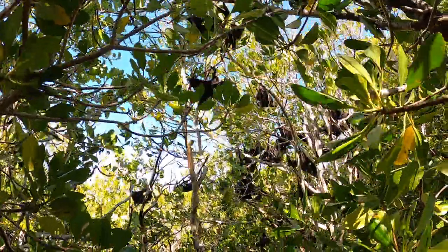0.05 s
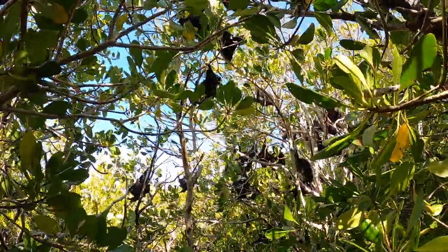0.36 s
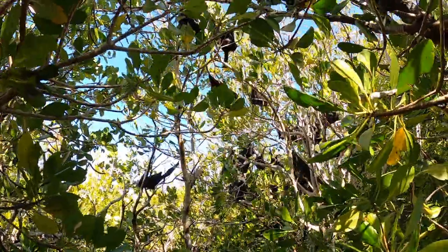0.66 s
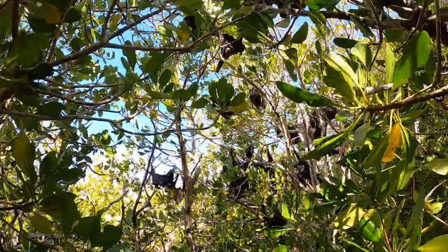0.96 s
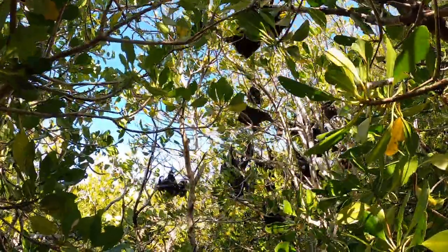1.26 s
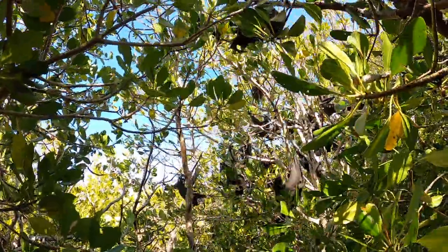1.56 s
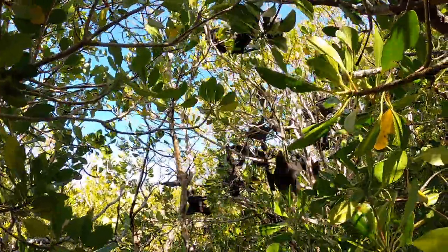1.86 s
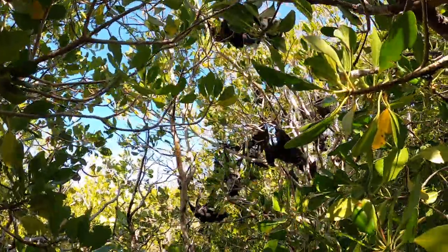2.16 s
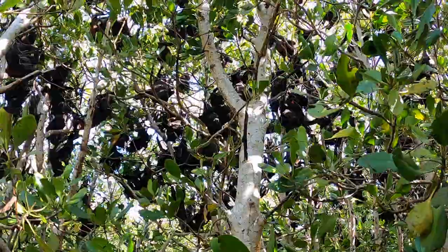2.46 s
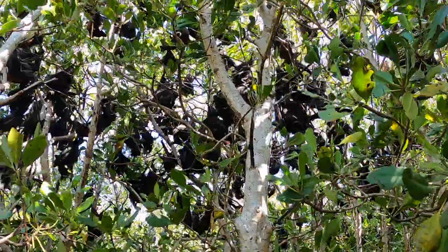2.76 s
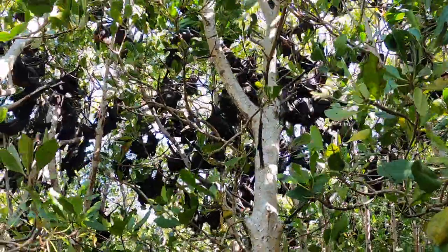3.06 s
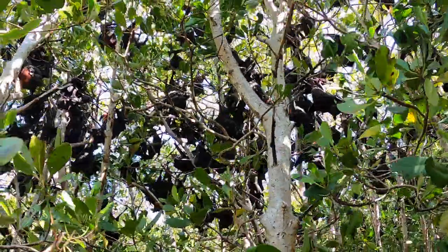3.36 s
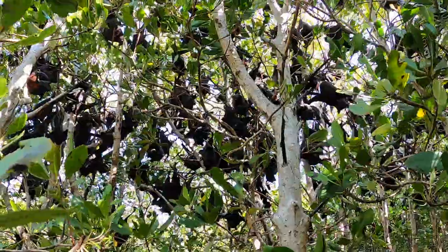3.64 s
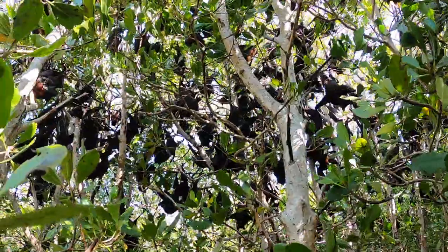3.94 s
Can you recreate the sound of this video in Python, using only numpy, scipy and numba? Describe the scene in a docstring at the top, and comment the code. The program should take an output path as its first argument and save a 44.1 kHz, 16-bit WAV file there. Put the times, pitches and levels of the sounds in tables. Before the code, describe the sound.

Fruit bats squeal raspily and give short yelps throughout the four seconds, over the dense chatter of a distant colony and a swelling hiss of high screeches. Leaves rustle faintly, and soft wing flaps come until about 2.3 seconds. Near 2.5 seconds the sound narrows as the listening spot changes, and the calls continue. Light wind puffs touch the microphone around 2.4 and 3 seconds.

```python
"""Rasping squeals and short yelps of fruit bats stand out of a dense far chatter in leafy trees. Larynx pulses
ring each bat's throat to make a squeal; a yelp is a shaky two-harmonic note. Trunks and foliage scatter the
calls. High screeches merge into a hiss, leaves rustle, wings flap and a little wind touches the microphone. At
2.49 s the stereo image narrows: from there on all but the top treble is mono."""
import sys
import numpy as np
from scipy import signal
from scipy.fft import rfft, irfft, next_fast_len
from scipy.io import wavfile
from scipy.ndimage import uniform_filter1d
from numba import njit

SR = 44100
rng = np.random.default_rng(int(sys.argv[2]) if len(sys.argv) > 2 else 0)


def generate_wav(sig):
    """Save sig (samples, or channels by samples) to the path in sys.argv[1] as 16-bit PCM at SR."""
    pcm = np.round(np.clip(np.atleast_2d(sig).T, -1, 1) * 32767).astype(np.int16)
    wavfile.write(sys.argv[1], SR, pcm)


N = 176400
CALL_N = SR // 2  # longest call, samples

# Mouth colour of near and far squeals. Each row: frequency in Hz, gain in dB.
MOUTH = [(200, -24), (900, -8), (1600, -6.5), (1850, -3.5), (2100, 1.5), (2450, -.5), (3000, 0.5),
         (7300, 0.5), (9000, -16), (13000, -16)]


def amp(db):
    """Decibels to gain."""
    return 10 ** (np.asarray(db) / 20)


def unit(x):
    """Scale to rms 1."""
    return x / np.sqrt(np.mean(x ** 2) + 1e-20)


def along(points, hz):
    """Interpolate (Hz, value) rows on a log axis."""
    knot_hz, values = np.transpose(points)
    return np.interp(np.log(hz + 1), np.log(knot_hz + 1), values)


def curve(rows):
    """One value per sample from (s, value) rows."""
    return np.interp(np.arange(N) / SR, *np.transpose(rows))


def wobble(rate_hz, n):
    """Random curve of n samples, rate_hz knots a second."""
    knots = rng.standard_normal(1024)
    return np.interp(np.arange(n) * rate_hz / SR, np.arange(len(knots)), knots)


def filtered(x, response):
    """Apply a gain given as a function of Hz."""
    size = next_fast_len(N + SR // 4)
    return irfft(rfft(x, size) * response(np.fft.rfftfreq(size, 1 / SR)), size)[..., :N]


def coloured(x, spectrum):
    """Shape x by (Hz, dB) rows, at rms 1."""
    return unit(filtered(x, lambda hz: amp(along(spectrum, hz))))


def add(track, start_s, sound):
    """Mix a sound in; it may overhang either end."""
    i = round(start_s * SR)
    part = sound[max(-i, 0):max(N - i, 0)]
    track[max(i, 0):][:len(part)] += part


@njit
def ring(drive, pole):
    """Moving resonance, applied twice for steep skirts."""
    out = np.zeros(len(drive))
    first = second = 0j
    for i in range(len(drive)):
        first = first * pole[i] + drive[i]
        second = second * pole[i] + first
        out[i] = second.real
    return out


def gesture(length_s, start_hz, end_hz, quaver):
    """Envelope and frequency of one call: a quavering glide, arched in the middle."""
    attack_s, release_s, arch, quaver_hz = 0.016, 0.022, 0.025, 113.7
    t = np.arange(min(int((length_s + release_s) * SR), CALL_N)) / SR
    progress = np.clip(t / length_s, 0, 1)
    env = np.clip(t / attack_s, 0, 1) * np.clip((length_s - t) / release_s / 2 + .5, 0, 1)
    bend = arch * (np.sin(np.pi * progress) - 2 / np.pi) + quaver * wobble(quaver_hz, len(t))
    return env, (start_hz + (end_hz - start_hz) * progress) * (1 + bend)


def flutter(voice, depth_db=1.5, rate_hz=110.4):
    """The level of a call trembles; rms 1."""
    return unit(voice * amp(depth_db * wobble(rate_hz, len(voice))))


def squeal(length_s, start_hz, end_hz, width_hz, whistle):
    """Uneven larynx pulses ring a gliding throat; a whistle rides on its resonance."""
    rasp_hz, pulse_scatter_db, air_db, upper_db = 452.1, 1.5, -17, -21.5
    env, hz = gesture(length_s, start_hz, end_hz, quaver=0.0121)
    pulse_hz = rasp_hz * np.exp(.3 * rng.normal() + .12 * wobble(rasp_hz, len(env)))
    pulses = np.diff(np.floor(np.cumsum(pulse_hz) / SR), prepend=0)
    size, air = rng.standard_normal((2, CALL_N))[:, :len(env)]
    drive = pulses * amp(pulse_scatter_db * size) + amp(air_db) * air

    def throat(centre_hz, band_hz):
        return unit(ring(drive, np.exp(np.pi * (2j * centre_hz - band_hz) / SR)))

    rasp = np.sqrt(1 - whistle) * throat(hz, 1.58 * width_hz)
    tone = np.sqrt(whistle) * np.sin(2 * np.pi * np.cumsum(hz) / SR)
    upper = amp(upper_db) * throat(np.minimum(2.28 * hz, 7000), band_hz=1330)
    return env * flutter(rasp + tone + upper)


def yelp(length_s, start_hz, end_hz, second_db):
    """Short voiced note of two harmonics with a shaky pitch."""
    env, hz = gesture(length_s, start_hz, end_hz, quaver=.008)
    phase = 2 * np.pi * np.cumsum(hz) / SR
    return env * flutter(np.sin(phase) + amp(second_db) * np.sin(2 * phase))


def grove(x, wet_db):
    """Direct sound plus scatter from trunks and foliage, as mid and side."""
    # Decay of the scatter. Each row: frequency in Hz, T60 in seconds.
    decay = [(200, 0.13), (2500, 0.33), (10000, 0.19)]
    hz, t, noise = signal.stft(rng.standard_normal((2, SR // 2)), SR, nperseg=256)
    tail = signal.istft(noise * amp(-60 * t / along(decay, hz)[:, None]), SR, nperseg=256)[1]
    response = amp(wet_db) * tail / np.linalg.norm(tail[0])
    response[0, 0] += 1  # direct path
    return signal.fftconvolve(x[None], response, axes=1)[:, :N] / np.sqrt(1 + amp(2 * wet_db))


def near(voice, rows):
    """Bats close by, one call per row."""
    track = np.zeros(N)
    for start_s, length_s, level_db, *shape in rows:
        add(track, start_s, amp(level_db) * voice(length_s, *shape))
    return track


def near_squeals():
    """Close squeals, coloured by the mouth and scattered by the trees."""
    # Each row: start in seconds, length in seconds, relative level in dB,
    # throat start, end and nominal width in Hz, whistle share 0-1.
    squeals = [(0, 0.11, -27.5, 2650, 2800, 610, 0.5), (0.032, 0.13, -34, 2150, 2122, 250, 0.5),
               (0.188, 0.2, -28.5, 2450, 2175, 610, 0.3), (0.176, 0.082, -32.5, 1560, 1440, 200, .5),
               (0.262, 0.083, -31, 1780, 1790, 150, .6), (0.379, 0.12, -29.5, 2300, 2330, 500, 0.04),
               (0.586, 0.12, -29, 2350, 2384, 540, 0.4), (0.719, .16, -27, 2850, 2660, 1170, 0.27),
               (0.739, .13, -39.5, 6500, 6100, 2200, .05), (0.858, .08, -31.5, 2500, 2120, 500, 0),
               (.91, .12, -27.5, 2980, 2870, 304, 0.07), (1.013, 0.061, -30, 3920, 4030, 1000, .2),
               (1.021, 0.15, -28.5, 2600, 2610, 547, 0.24), (1.148, 0.075, -26.5, 2780, 2810, 540, 0),
               (1.22, 0.1, -30, 2650, 2520, 450, 0.2), (1.321, .15, -32.5, 3400, 3600, 1300, 0.2),
               (1.427, 0.19, -32.5, 3740, 4150, 1690, 0), (1.387, 0.23, -31, 2400, 2230, 495, .1),
               (1.584, 0.09, -25, 2380, 2450, 298, 0.7), (1.675, .11, -24.5, 2424, 2427, 220, 0.83),
               (1.796, 0.097, -30, 3750, 3470, 1300, 0.3), (1.816, 0.034, -39, 6350, 6500, 1500, .1),
               (1.875, 0.17, -28.5, 2550, 2550, 577, 0.14), (1.997, 0.15, -28, 2520, 2680, 446, 0.8),
               (2.179, 0.061, -27, 2600, 2550, 573, 0.05), (2.286, 0.12, -28, 2480, 2325, 500, 0.45),
               (2.405, 0.069, -24.5, 2230, 2450, 346, .45), (2.481, 0.052, -21.5, 3350, 3550, 750, 0.54),
               (2.481, 0.092, -30.5, 2350, 2150, 500, 0), (2.53, .2, -32, 3950, 3400, 1500, 0),
               (2.663, 0.052, -42, 7270, 7200, 400, .5), (2.68, .055, -37, 6750, 6600, 400, .5),
               (2.728, 0.12, -28.5, 2230, 2260, 795, 0), (2.76, 0.17, -35, 5040, 5300, 1600, .06),
               (2.848, 0.056, -24, 2380, 2360, 495, 0.24), (2.941, 0.024, -19, 2400, 2433, 346, 0.2),
               (3.084, 0.033, -22.5, 2350, 2347, 300, 0.7), (3.116, 0.043, -24.5, 2850, 2940, 700, 0.3),
               (3.163, 0.11, -28.5, 2450, 2520, 550, 0.3), (3.233, 0.11, -26, 2850, 2930, 696, 0.1),
               (3.346, .065, -25, 3000, 2920, 500, 0.4), (3.192, 0.19, -32.5, 4400, 4310, 1300, 0.1),
               (3.405, 0.15, -28.5, 2550, 2447, 590, 0.4), (3.558, 0.085, -30, 2500, 2450, 500, 0.05),
               (3.625, 0.016, -26, 3400, 4400, 1500, 0.1), (3.818, 0.093, -28, 2230, 2270, 450, 0.4),
               (3.902, 0.23, -30, 2400, 2460, 544, 0.2), (3.84, 0.14, -35.5, 5500, 5530, 1500, .08),
               (3.837, .09, -33.5, 7200, 7600, 1500, .08)]
    calls = filtered(near(squeal, squeals), lambda hz: amp(along(MOUTH, hz)))
    return grove(calls, wet_db=-4.5)


def crowd(voice, centre_hz, spread, timbre, count, typical_s):
    """Many far bats calling at random; rms 1."""
    scatter_db = 1.3
    track = np.zeros(N)
    for k, (late, stretch, pitch, glide, loud) in enumerate(rng.standard_normal((count, 5))):
        hz = centre_hz * np.exp(spread * pitch)
        call = voice(typical_s * np.exp(0.406 * stretch), hz, hz * np.exp(.08 * glide), *timbre)
        start_s = (k + late / 2) / count * (N / SR + typical_s) - typical_s
        add(track, start_s, amp(scatter_db * loud) * call)
    return unit(track)


def colony():
    """The far roost through the trees: squeals, yelps and a murmur of low calls."""
    # Swell of each layer. Each row: time in seconds, relative level in dB.
    chatter_db = [(0.0, -25), (0.24, -28), (0.45, -36), (0.65, -26), (0.81, -27), (1.01, -25.5),
                  (1.26, -29.5), (1.47, -24), (1.56, -27.5), (2.25, -27), (3.35, -29), (3.62, -30),
                  (3.85, -26.5), (3.95, -30.5)]
    yelps_db = [(0, -47.5), (.9, -46), (1.2, -50.5), (2.1, -51), (2.4, -47), (2.8, -46), (3.3, -43.5),
                (3.65, -48), (4, -45)]
    murmur_db = [(0, -47), (1, -49.5), (1.8, -52.5), (2.4, -50.5), (2.7, -45), (4, -45.5)]
    squeals = crowd(squeal, 2413, spread=.1, timbre=(520, .2), count=140, typical_s=.12)
    yelps = crowd(yelp, 1400, spread=.17, timbre=(-8,), count=130, typical_s=.05)
    murmur = crowd(yelp, 530, spread=.14, timbre=(-12,), count=150, typical_s=.05)
    chatter = amp(curve(chatter_db) - 4) * coloured(squeals, MOUTH)
    roost = chatter + amp(curve(yelps_db)) * yelps + amp(curve(murmur_db)) * murmur
    return grove(roost, wet_db=-4)[0]


def patchy(x, depth_db=1.6):
    """Narrow bands flicker on their own."""
    bands = signal.stft(x, nperseg=512)[2]
    flicker = uniform_filter1d(rng.standard_normal(bands.shape), size=3, axis=0)
    flicker = uniform_filter1d(flicker, size=8, axis=1)
    return signal.istft(bands * amp(depth_db * unit(flicker)), nperseg=512)[1][:N]


def screeches():
    """High, airy screeches merge into a swelling hiss."""
    # Swell of the hiss. Each row: time in seconds, relative level in dB.
    swell_db = [(0.0, -35), (0.17, -39.5), (0.21, -35.5), (0.51, -37.5), (0.84, -33.5), (0.94, -41),
                (1.12, -38), (1.2, -39.5), (1.54, -38.5), (1.56, -41), (1.61, -35.5), (1.65, -36.5),
                (1.78, -34), (1.81, -39), (1.83, -34), (1.92, -36), (2.55, -34.5), (2.58, -42),
                (2.69, -34.5), (2.9, -31.5), (3.07, -36.5), (3.27, -32), (3.46, -34), (3.58, -32.5),
                (3.8, -40), (3.87, -29.5), (3.97, -30.5), (3.98, -28.5)]
    # Its colour. Each row: frequency in Hz, gain in dB.
    spectrum = [(1200, -70), (2500, -20), (3600, -0.5), (4600, 1.5), (5600, 2), (7200, -4), (7900, -8.5),
                (8600, -10), (10000, -14), (11500, -21), (12500, -19), (15500, -35)]
    voices = crowd(squeal, 6400, spread=.22, timbre=(3000, .12), count=110, typical_s=.13)
    air = amp(6) * rng.standard_normal(N)
    return amp(curve(swell_db) + 0.1) * coloured(patchy(unit(voices + air)), spectrum)


def leaves(level_db=-40.5):
    """Steady hiss of foliage, as mid and side."""
    # Leaf noise. Each row: frequency in Hz, gain in dB.
    spectrum = [(30, 0), (100, -3), (200, -0.5), (400, 2.5), (550, -1), (800, -2.5), (1200, 0), (1700, 0),
                (2100, -0.5), (3500, 1), (6000, -29.5), (15000, -36)]
    return amp(level_db) * coloured(rng.standard_normal((2, N)), spectrum)


def swells(rows, sigma_s, spectrum):
    """Soft Gaussian pushes of air, as mid and side."""
    t = np.arange(N) / SR
    env = sum(amp(db) * np.exp(-.5 * ((t - peak_s) / sigma_s) ** 2) for peak_s, db in rows)
    return env * coloured(rng.standard_normal((2, N)), spectrum)


def wings():
    """Each wingbeat pushes a low puff of air."""
    # Each row: peak time in seconds, level in dB.
    flaps = [(.09, -41), (.24, -41), (.30, -42.5), (.42, -40.5), (.60, -41), (.72, -44.5), (.84, -41),
             (.96, -44.5), (1.02, -46.5), (1.15, -47), (1.23, -50), (1.32, -42.5), (1.37, -46), (1.46, -48),
             (1.745, -46.5), (1.91, -43), (2.19, -41), (2.33, -43)]
    air_hz_db = [(25, -31), (60, -3.5), (100, -2), (200, -5), (330, -11.5), (800, -21), (3000, -60)]
    return swells(flaps, sigma_s=0.029, spectrum=air_hz_db)


def near_yelps():
    """Close yelps, lightly scattered by the trees."""
    # Each row: start in seconds, length in seconds, relative level in dB,
    # start and end pitch in Hz, second harmonic in dB.
    yelps = [(0.459, 0.094, -52, 1252, 1250, -15), (.75, 0.15, -43.5, 552, 549, -9),
             (0.926, 0.044, -39.5, 1114, 1280, -8), (1.069, 0.04, -40.5, 1020, 1083, -15),
             (1.289, 0.043, -33, 1416, 1586, 0), (1.475, 0.041, -40, 1315, 1450, -10),
             (1.681, .095, -41, 538, 567, -1), (1.859, .08, -39, 1236, 1232, -6),
             (2.32, 0.035, -36.5, 1180, 1090, -13), (2.70, 0.17, -44, 1205, 1230, -3),
             (2.88, 0.071, -41, 993, 1103, -3), (3.065, .03, -26, 1423, 1650, 9),
             (3.08, 0.069, -41.5, 1150, 1216, -6), (3.325, 0.042, -38.5, 471, 511, -12),
             (3.513, 0.07, -44, 1300, 1244, -10), (3.884, 0.13, -46, 673, 730, -24)]
    return grove(near(yelp, yelps), wet_db=-13)


def wind():
    """Puffs of wind rumble on the microphone."""
    # Each row: peak time in seconds, level in dB.
    puffs = [(2.35, -48), (2.43, -39), (3.05, -40), (3.78, -46)]
    rumble_hz_db = [(20, 6), (38, 2), (70, -2), (150, -34), (600, -70)]
    return swells(puffs, sigma_s=0.035, spectrum=rumble_hz_db)


def wide_image(mid, side, calls):
    """Closely spaced microphone ports: calls reach the right first; the left is slightly louder."""
    left_lag_s, balance_db = 3.3e-5, 0.8
    side = side + filtered(calls, lambda hz: -1j * np.sin(np.pi * hz * left_lag_s))
    return np.array([mid + side, mid - side]) * amp([[balance_db / 2], [-balance_db / 2]])


def narrow_image(mid, side):
    """Mono up to the top treble, which is wide and leans right."""
    # Colour from 2.49 s on. Each row: frequency in Hz, gain in dB.
    colour = [(30, 0), (80, -2), (170, -6.5), (380, 0.5), (800, -0.5), (2000, 1), (7000, -1), (8500, 3.5),
              (11000, 1), (15000, 3)]
    wide_above_hz, lean_db = 11140, 3

    def response(hz):
        return amp(along(colour, hz) + np.outer([-.5, .5], lean_db * (hz > wide_above_hz)))

    side = filtered(side, lambda hz: hz > wide_above_hz)
    return filtered(np.array([mid + side, mid - side]), response)


def scene():
    """Bats, leaves, wings and wind; the stereo image narrows at 2.49 s."""
    # Width of the diffuse sound. Each row: frequency in Hz, side gain in dB.
    width = [(30, -3), (70, -25), (200, -20), (500, -17), (1200, -12.5), (2400, -8), (4000, -3), (6000, -3),
             (9000, -1.5), (15000, -0.5)]
    narrow_s = 2.49
    calls = np.array([colony(), colony()]) + near_squeals() + near_yelps()
    hiss = np.array([screeches(), screeches()])
    mid, side = calls + hiss + leaves() + wings() + wind()
    side = filtered(side, lambda hz: amp(along(width, hz)))
    narrowed = curve([(narrow_s - .01, 0), (narrow_s + .01, 1)])
    return (1 - narrowed) * wide_image(mid, side, calls[0]) + narrowed * narrow_image(mid, side)


def record(dry, top_hz=15700):
    """Nothing passes above the band limit."""
    return filtered(dry, lambda hz: hz < top_hz)


dry = scene()
out = record(dry)
generate_wav(out)
```